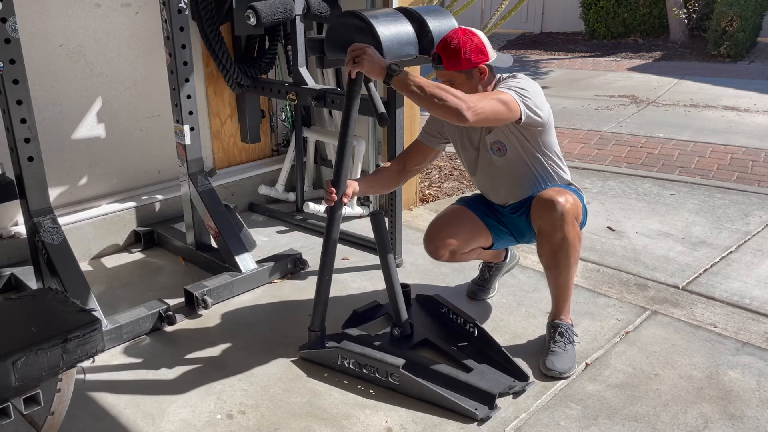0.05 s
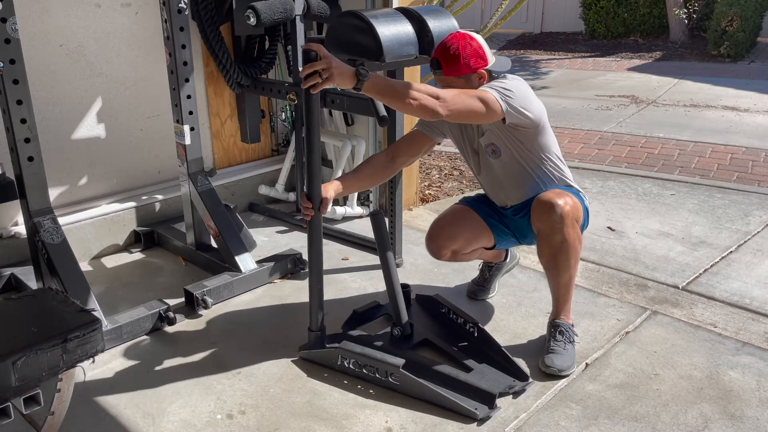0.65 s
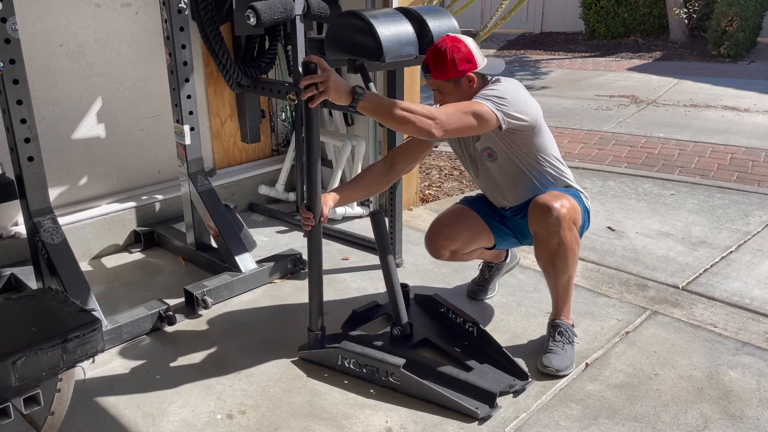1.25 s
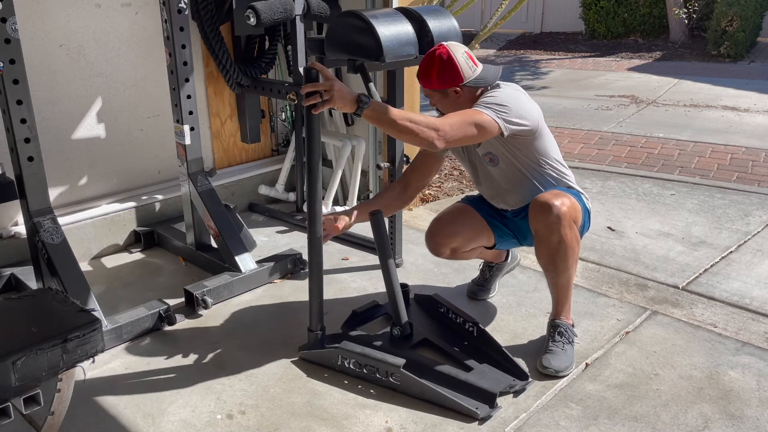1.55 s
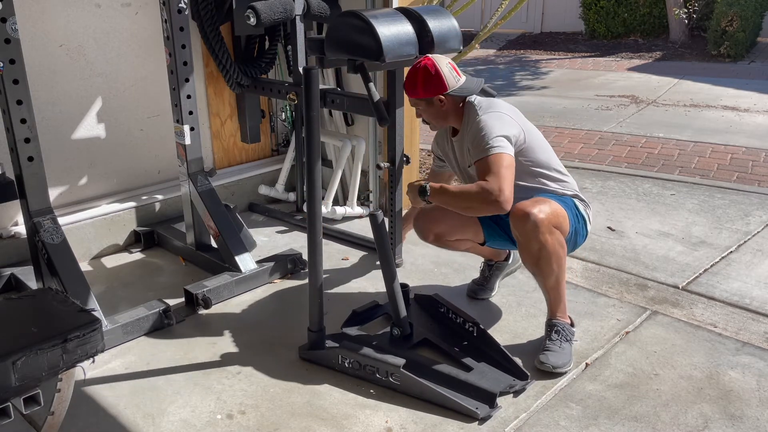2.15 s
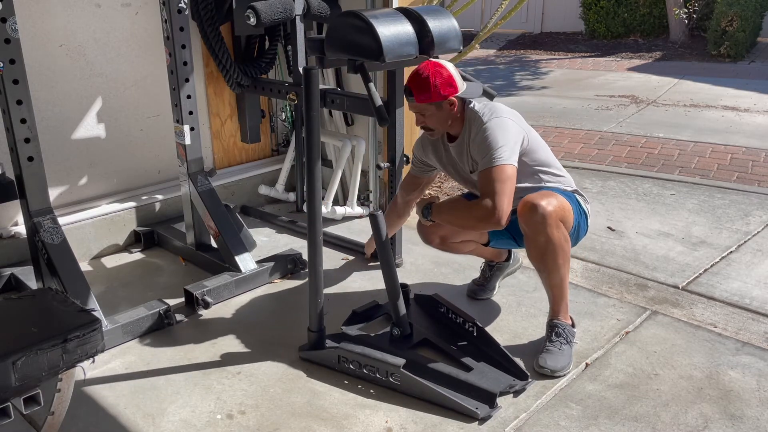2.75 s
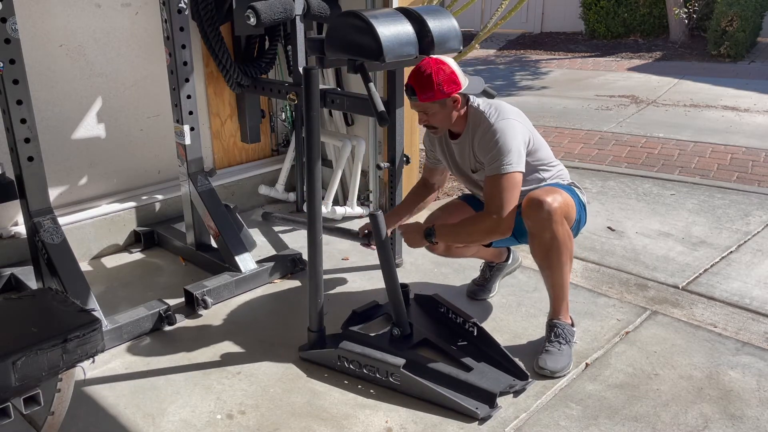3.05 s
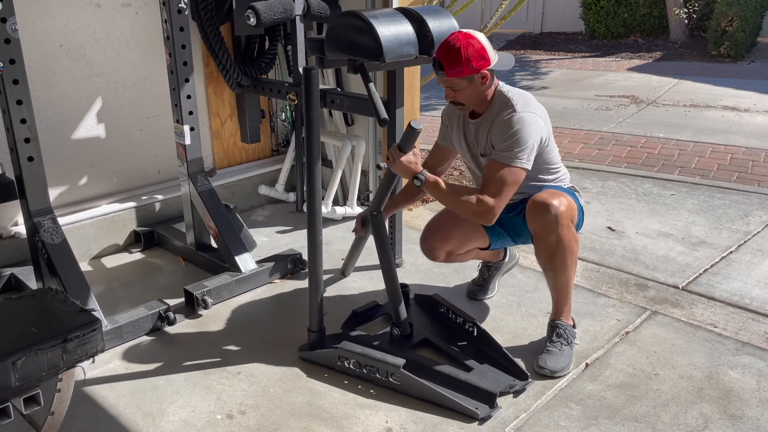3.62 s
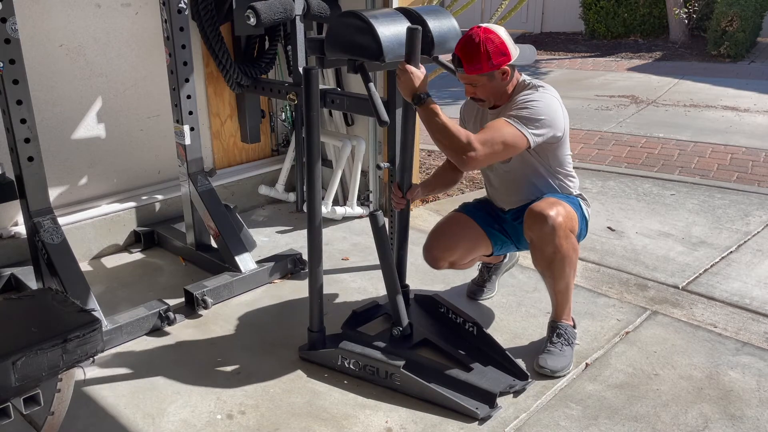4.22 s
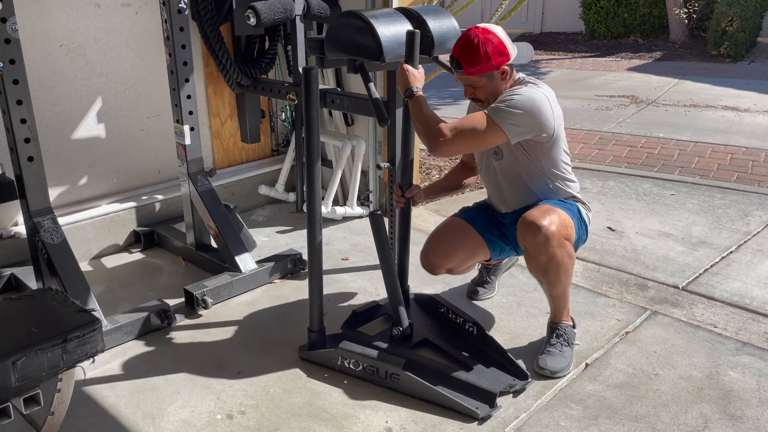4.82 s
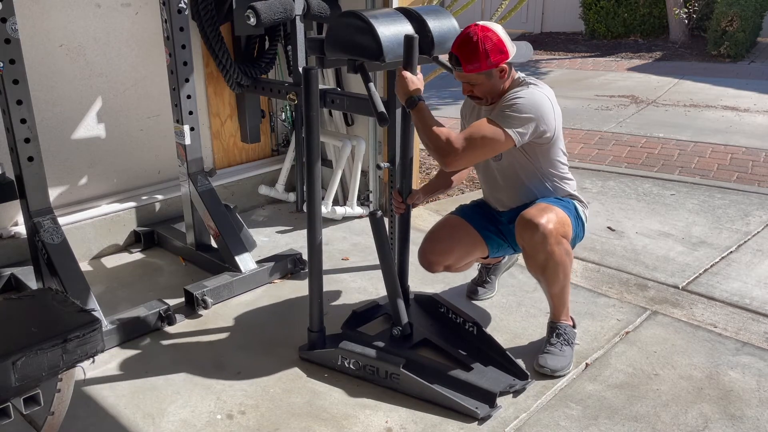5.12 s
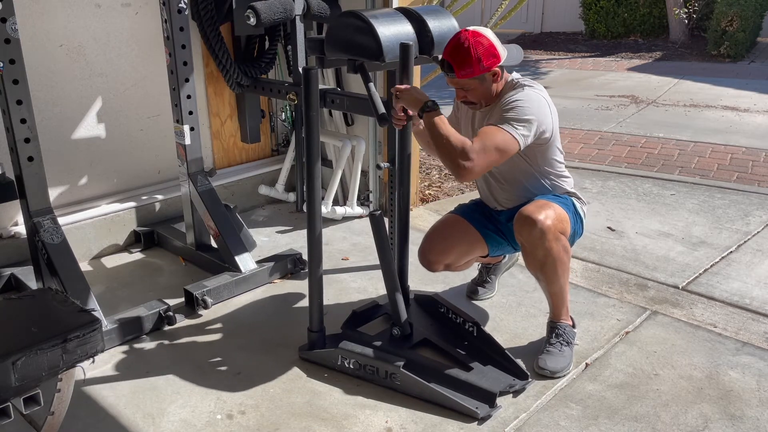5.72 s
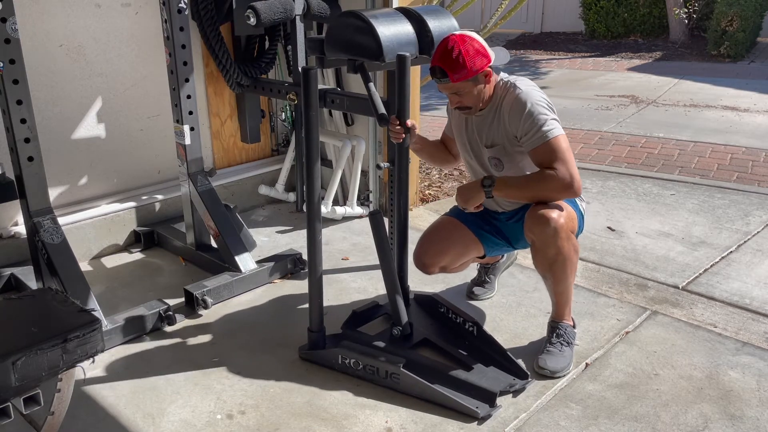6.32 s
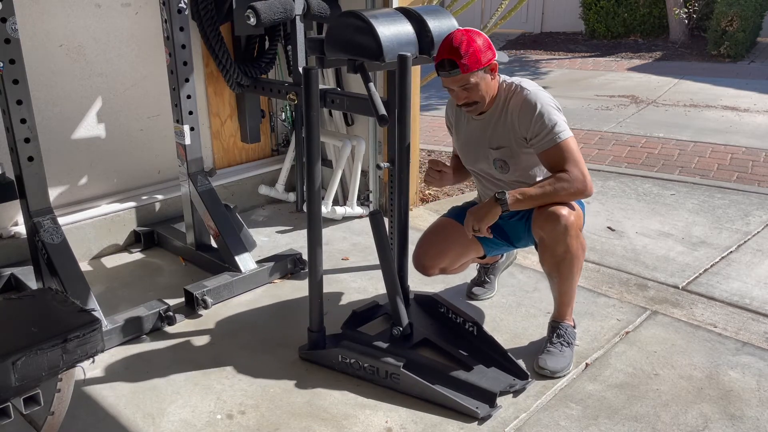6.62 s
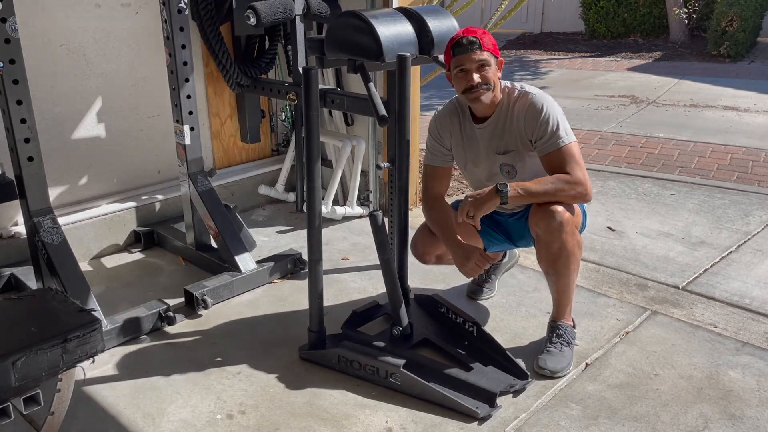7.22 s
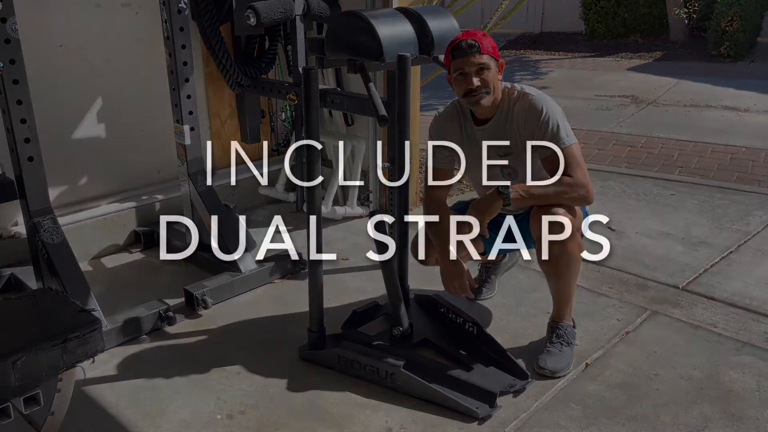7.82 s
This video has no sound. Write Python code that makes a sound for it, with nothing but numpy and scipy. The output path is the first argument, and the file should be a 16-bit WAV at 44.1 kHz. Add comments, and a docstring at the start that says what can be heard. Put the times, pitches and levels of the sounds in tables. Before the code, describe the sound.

A steel sled's post grinds upright and clanks home, then a tube scrapes out, ringing, and drops into its socket with a loud clank.

```python
"""A folding steel push sled is set up at the open door of a garage gym.
Its hinged post grinds upright and clanks home, ringing the frame; a loose steel tube is drawn out
scraping and ringing, knocked into its socket and dropped to the stop. Steel squeals, hands and clothes
brush it, and a low drone and a far bird come in late over still outdoor air.
The hardest clanks overload the microphone, whose gain control ducks and then lifts the ringing tail."""
import sys
import numpy as np
from scipy import signal
from scipy.fft import rfft, irfft, next_fast_len
from scipy.io import wavfile
from scipy.ndimage import uniform_filter1d, minimum_filter1d

SR = 44100
rng = np.random.default_rng(int(sys.argv[2]) if len(sys.argv) > 2 else 0)


def file_out(sig):
    """Save sig as 16-bit WAV at sys.argv[1]."""
    # one column per channel
    cols = np.atleast_2d(sig).T
    # limit, then scale
    lim = np.clip(cols, -1, 1)
    pcm = np.round(lim * 32767).astype(np.int16)
    wavfile.write(sys.argv[1], SR, pcm)


N = 355429
TIME = np.arange(N) / SR
RING_TIME, BURST_TIME = TIME[:N // 8], TIME[:N // 40]

# stereo width, side relative to mid: pitch_hz, width_db
STEREO_WIDTH = [(50, -16), (170, -14), (380, -6), (600, -4), (1000, -1.5), (2100, -7), (4400, -6),
                (6200, -2), (7600, 23), (10000, -14.5), (12000, -2), (14500, 7.5)]
# spectrum of still outdoor air: pitch_hz, level_db
AIR_EQ = [(20, -24), (40, -15.5), (70, -0.5), (150, -6.5), (250, -15), (520, -16.5), (950, -22),
          (1500, -29), (2200, -40), (2900, -40.5), (3600, -44.5), (7000, -49), (11000, -48.5), (15000, -65)]
# where the frame is struck, in the order of the level columns below: place
STRIKE_PLACES = ["hinge", "latch", "socket", "stop"]
# clear ring of the frame: pitch_hz, t60_s, hinge_db, latch_db, socket_db, stop_db
FRAME_PARTIALS = [(475.3, 0.71, -6, -26.5, -30, -15.5), (508.4, 1, -19.5, -27, -13, -21),
                  (649, 0.73, -3.5, -11, 0.5, -21), (661.4, 0.73, -5.5, -7, -2, -11),
                  (733, 0.79, -0.5, -6.5, -16.5, -3.5), (771, 0.79, -2, -3, -4, -11.5),
                  (894, 0.51, -16.5, -22.0, -11.5, -21.5), (980, 0.68, -9.0, -22, -20.5, -23.0),
                  (1008, 0.92, -11.5, -22.5, -20.5, -14), (1085, 0.94, -20.5, -8, -9.5, -17),
                  (1222, 0.4, -14.5, -19.5, -20, -22.0), (1336, 0.77, -8, -4.5, -4, -4.5),
                  (1340, 0.84, -13.0, -4.5, -3.5, -4), (1433, 1, -11.0, -19.5, -21.0, -13),
                  (1488, 0.7, -16.5, -11.5, -15.0, -7.5), (1700, 0.29, -15.5, -20.0, -23, -19),
                  (1647, 0.62, -23.5, -6, -10.5, -13.5), (1863, 0.61, -13, -22.5, -13.0, -8),
                  (1968, 0.6, -20.5, -8.5, -14, -11.5), (2000, 0.6, -13.0, -15.5, -13.5, -15.5),
                  (2185, 0.59, -10.5, -13, -11, -10.5), (2265, 0.36, -10.5, -16, -18.5, -12.0),
                  (2369, 0.52, -26.5, -18.5, -28.5, -6.0), (2412, 0.44, -25.5, -10, -20.5, -26.5),
                  (2600, 0.58, -24.0, -8, -27.0, -5.5), (2650, 0.64, -12.5, -29.0, -18, -9),
                  (2740, 0.57, -17.0, -23, -29.5, -10.5), (2885, 0.57, -26.5, -13.5, -15.5, -18),
                  (2910, 0.69, -25.5, -23.5, -16, -16.5), (3080, 0.67, -27.5, -15, -26.0, -23.5),
                  (3244, 0.56, -11.0, -11, -39.5, -13), (3236, 0.55, -14.5, -10.0, -32.0, -18.5),
                  (3340, 0.55, -31.5, -19.5, -23.5, -14.5), (3430, 0.55, -21.5, -14.5, -26.0, -11.5),
                  (3660, 0.54, -19.5, -11.5, -28.0, -28), (3704, 0.54, -17.0, -13, -26, -8),
                  (3810, 0.59, -28, -12.0, -39.5, -14.5), (3850, 0.54, -21.0, -13.5, -20, -20.5),
                  (4120, 0.49, -22, -16, -34.5, -11), (4371, 0.53, -19, -34, -23, -33.0),
                  (4610, 0.52, -16.0, -11.5, -25.5, -14.5), (4753, 0.67, -27.5, -16, -40.5, -31),
                  (4860, 0.57, -21.0, -23.5, -27, -12), (5109, 0.55, -19, -20, -39, -24.5),
                  (5250, 0.7, -15.0, -21, -37.5, -35.0), (5410, 0.51, -29, -31.5, -27.5, -18.5)]
# spectrum of the crowd of weaker plate modes: pitch_hz, hinge_db, latch_db, socket_db, stop_db
PLATE_EQ = [(92.7, -27, -27.5, -38, -29.5), (203, -6.5, -10.5, 1.5, -15.5), (380, -4.5, -14, -7, -15.5),
            (546, -3, -6, 1, -8.5), (695, 6.5, 0.5, 9.5, -3), (930, 0, -3.5, 6, -7), (1360, -2, -1, 4, -4),
            (2040, -1, 1.5, 2.5, 2), (2820, -6.5, -4.5, -6, -9.5), (3600, -16, -11.5, -17, -13),
            (5100, -13.5, -14, -13, -14), (6200, -20, -20.5, -20, -19), (9900, -23.5, -24, -34, -26),
            (14640, -37, -39, -45.5, -34)]
# how long frame and garage ring together: pitch_hz, t60_s
RING_DECAY = [(100, 0.98), (350, 0.58), (700, 0.65), (2000, 0.58), (4000, 0.48), (7000, 0.4), (13000, 0.49)]
# shoves that grind steel on steel: place, start_s, rise_s, hold_s, grind_db, hiss_db, rumble_db
GRIND_SHOVES = [("hinge", 0.0, .005, 0.051, -39.5, -71.5, -87.5),
                ("hinge", 0.17, 0.072, 0.076, -48.5, -70.5, -60.5),
                ("hinge", 0.49, 0.03, 0.1, -56.5, -61, -72),
                ("hinge", 0.575, 0.017, 0.11, -29, -56.5, -36.5),
                ("hinge", 0.76, 0.013, 0.017, -43, -52.5, -46.5),
                ("hinge", 0.885, 0.012, 0.01, -51, -59.5, -53),
                ("latch", 1.006, 0.0053, 0.062, -30, -47.5, -71),
                ("hinge", 1.052, 0.011, 0.11, -19.5, -44, -31),
                ("socket", 4.895, 0.044, 0.017, -44.5, -58.5, -53.5),
                ("socket", 5.072, 0.014, 0.015, -48.5, -63, -50.5),
                ("socket", 4.5, 0.016, 0.055, -45, -57, -47.5),
                ("socket", 5.305, 0.027, 0.018, -34, -50.5, -37),
                ("socket", 5.36, .015, 0.052, -42.5, -58.5, -42),
                ("socket", 5.48, 0.023, 0.062, -57.5, -66, -49.5),
                ("socket", 5.724, 0.016, 0.008, -51.5, -67, -55.5),
                ("socket", 5.908, 0.005, 0.044, -34, -48, -66.5)]
# the part of the frame's ring that grinding reaches: place, low_hz, high_hz
GRIND_RANGES = [("hinge", 150, 1600), ("latch", 1300, 1700), ("socket", 800, 2400)]
# spectrum of the base on the concrete: pitch_hz, level_db
BASE_EQ = [(40, -25.5), (100, -3.5), (150, 1.5), (195, 4), (260, -6), (400, -10.5), (700, -50.5)]
# blows on the frame: start_s, place, strength_db, brightness_hz
FRAME_HITS = [(0.001, "hinge", -28, 2000), (0.575, "hinge", -29, 2800), (0.604, "hinge", -18.5, 1700),
              (0.647, "hinge", -18.5, 1900), (0.7025, "hinge", -22, 2880), (0.758, "hinge", -29.5, 3200),
              (1.072, "hinge", -13.5, 2780), (1.1013, "hinge", -1, 3600), (1.114, "hinge", -5, 2220),
              (1.144, "hinge", -10, 1200), (1.226, "latch", 2, 5620), (2.447, "stop", -57, 4500),
              (4.263, "socket", -8, 2570), (4.2695, "socket", -5, 2700), (4.561, "socket", -18, 1590),
              (4.597, "socket", -11, 2600), (5.202, "socket", -35.5, 2000), (5.396, "socket", -23, 1700),
              (5.956, "stop", 6, 6000)]
# spectrum of the whole sled rocking: pitch_hz, level_db
ROCKING_EQ = [(25, -5), (60, -4), (130, 12), (250, -7), (600, -44.5)]
# steel squeals, groans and the frame's lingering high ring: peak_s, level_db, pitch_hz, half_length_s
STEEL_TONES = [(1.139, -23, 725, .03), (1.68, -58, 3825, 0.12), (3.02, -16, 1700, 0.0082),
               (3.06, -24.5, 2658, 0.01366), (3.085, -23.5, 1658, 0.026), (3.303, -20, 910, 0.021),
               (3.36, -12.5, 909, 0.015), (3.548, -13.5, 894, .005), (5.245, -34, 432, 0.009),
               (5.258, -30, 140, .012), (5.277, -27, 186, .013), (5.34, -37.5, 174.3, .025),
               (5.397, -33.5, 188, .014)]
# hands and clothes brushing: peak_s, level_db, half_length_s
BRUSH_CUES = [(2.061, -71.5, 0.032), (2.699, -67.5, .032), (3.291, -54, 0.063), (3.557, -56.5, .046),
              (3.977, -75.5, .22), (4.377, -65, 0.091), (4.948, -56, 0.025), (5.163, -61, 0.078),
              (5.244, -52.5, 0.0037), (6.324, -58, 0.087), (6.666, -68, 0.029)]
# spectrum of skin and cloth on steel: pitch_hz, level_db
BRUSH_EQ = [(1500, -13), (3500, -1), (5200, -2.5), (7500, -3), (10000, -5.5), (12500, -6), (14000, -15)]
# light grazes as the hand takes the tube: start_s, rise_s, hold_s, bending_db, wall_db, rub_db
TUBE_GRAZES = [(2.13, 0.026, 0.019, -61.5, -63, -64.5), (2.55, 0.022, 0.044, -79, -62.5, -75),
               (2.745, 0.015, 0.032, -71, -66.5, -61)]
# how hard the tube scrapes as it is drawn out: time_s, level_db
SCRAPE_CURVE = [(2.7, -88), (2.78, -54), (2.86, -48), (2.912, -39), (2.995, -42), (3.04, -35),
                (3.14, -36.5), (3.304, -30), (3.42, -36), (3.56, -36), (3.69, -58), (3.9, -86)]
# low ring of the tube flexing: pitch_hz, width_hz, level_db
BENDING_MODES = [(909.3, 16, 1.5), (880, 39, -1.5), (1698.5, 39, -0.5), (1714, 47, -15), (2580, 18, -32)]
# bright ring of the tube's wall: pitch_hz, width_hz, level_db
WALL_MODES = [(2683, 27, 6), (3760, 14, -3), (4550, 30, -5.5), (4414, 20, 3), (4490, 16, -0.5),
              (4670, 28, -2), (4670, 28, -2.5), (4960, 28, -7), (5000, 19, -0.5), (5330, 40, -3.5),
              (5710, 19.8, -2), (6240, 27, -8.5), (6777, 28, -8), (7470, 31, -11.5), (8140, 25, -21),
              (8796, 24, -14), (9572, 24, -20.5), (10270, 40, -19.5), (11122, 50, -27), (11461, 30, -24.5),
              (12129, 31, -15), (12540, 130, -13.5)]
# spectrum of the tube rubbing its holder: pitch_hz, level_db
RUB_EQ = [(60, -29.5), (145, -27), (185, 0), (310, 5.5), (430, 3.5), (680, 7.5), (1100, 5.5), (1450, -2),
          (2200, -9), (3400, -21), (5000, -39), (7000, -50), (12000, -42.5), (15000, -37)]
# the tube bumps its holder: start_s, knock_db, thud_db
TUBE_BUMPS = [(3.013, -18, -39), (3.21, -33.5, -45.5), (3.322, -33, -32), (3.362, -22.5, -36.5),
              (3.531, -33.5, -34.5)]
# swells of a low drone that sets in as the tube sinks: start_s, rise_s, hold_s, level_db
DRONE_SWELLS = [(5.27, .02, 0.054, -38.5), (5.47, .04, 0.07, -52), (5.82, 0.055, .1, -52),
                (6.27, .05, 0.09, -46), (7.15, .08, .13, -59)]
# a far bird's call: start_s, rise_s, hold_s, level_db
BIRD_CUES = [(7.52, .03, .41, -81)]
# spectrum of that call: pitch_hz, level_db
BIRD_EQ = [(1500, -70), (2350, -18), (2650, -4), (2950, 0), (3250, -18), (4500, -70)]


def from_db(db):
    """Decibels to gain."""
    return np.exp(np.asarray(db) * (np.log(10) / 20))


def unit_power(x):
    """Scale to an RMS of one."""
    return x / np.sqrt(np.mean(x ** 2) + 1e-20)


def unit_energy(x):
    """Scale a response so that it passes white noise at equal power."""
    return unit_power(x) / np.sqrt(x.shape[-1])


def at_hz(points, hz):
    """Read a table on a log-frequency axis."""
    points_hz, values = np.transpose(points)
    return np.interp(np.log(np.maximum(hz, 1)), np.log(points_hz), values)


def butter(x, hz, kind, order=2):
    """Butterworth low-pass or high-pass."""
    return signal.sosfilt(signal.butter(order, hz, kind, fs=SR, output="sos"), x)


def through(force, response):
    """Play a force through a stereo response."""
    return signal.oaconvolve(np.atleast_2d(force), response, axes=-1)[:, :N]


def add(out, start_s, sound):
    """Mix a sound in at its cue."""
    start = max(round(start_s * SR), 0)
    out[:, start:start + sound.shape[-1]] += sound[:, :N - start]


def spread(mid, side, hz):
    """Left and right from mid and side, with the width set by pitch."""
    width = from_db(at_hz(STEREO_WIDTH, hz))
    return np.array([mid + width * side, mid - width * side]) / np.sqrt(1 + width ** 2)


def noise(eq, size=N):
    """Stereo noise of a given spectrum, at unit power."""
    length = next_fast_len(size)
    mid, side = rfft(rng.standard_normal((2, length)))
    hz = np.arange(len(mid)) * SR / length
    spectrum = spread(mid, side, hz) * from_db(at_hz(eq, hz))
    return unit_power(irfft(spectrum, length)[:, :size])


def burst(eq, rise_s, decay_s):
    """A short contact noise that swells and dies."""
    envelope = (1 - np.exp(-BURST_TIME / rise_s)) * np.exp(-BURST_TIME / decay_s)
    return envelope * noise(eq, len(BURST_TIME))


def swells(cues, release_s):
    """One envelope per level column: rise to the cue, hold, release; overlaps add in power."""
    power = 0
    for start_s, rise_s, hold_s, *levels_db in cues:
        early = np.maximum(start_s - TIME, 0) / rise_s
        late = np.maximum(TIME - start_s - hold_s, 0) / release_s
        envelope = np.exp(-np.minimum(early + late, 30))
        power = power + np.outer(from_db(levels_db), envelope) ** 2
    return np.sqrt(power)


def bell_curve(from_peak_s, half_s):
    """A smooth fade in and out around a peak."""
    return np.exp(-np.minimum((from_peak_s / half_s) ** 2, 50))


def flutter(per_s, depth_db):
    """A randomly wavering gain, like the uneven pressure of a sliding contact."""
    knots_s = np.arange(0, TIME[-1] + 1, 1 / per_s)
    wobble = rng.standard_normal(2000)[:len(knots_s)]
    return from_db(depth_db * np.interp(TIME, knots_s, wobble))


def outdoor_air():
    """A steady bed of quiet, mostly low noise."""
    return from_db(-60.5) * noise(AIR_EQ)


def mode(hz, t60_s):
    """One decaying sine, reaching the two sides out of phase."""
    phase = 2 * np.pi * (hz * RING_TIME + rng.random())
    tone = spread(np.sin(phase), np.cos(phase) * rng.choice([-1, 1]), hz)
    return tone * from_db(-60 * RING_TIME / t60_s)


def frame_modes(split_hz, twin_db, joint_loss_db_per_s):
    """The clear ring by place: the sled's halves are slightly out of tune, and loose joints damp them."""
    pairs = []
    for hz, t60_s, *_ in FRAME_PARTIALS:
        twin_hz = hz + split_hz * rng.uniform(0.32, 1.8) * rng.choice([-1, 1])
        pairs.append(mode(hz, t60_s) + from_db(twin_db) * mode(twin_hz, t60_s))
    rings = np.array(pairs) * from_db(-joint_loss_db_per_s * RING_TIME)
    strengths = from_db(np.array(FRAME_PARTIALS)[:, 2:].T)
    return dict(zip(STRIKE_PLACES, np.tensordot(strengths, rings, axes=1)))


def dense_ring(eq, damping):
    """A wash of countless overlapping modes: each octave dies at its own pace."""
    size = len(RING_TIME)
    spectrum = rfft(noise(eq, size), 2 * next_fast_len(size // 2 + 1))
    hz = np.linspace(1, SR / 2, spectrum.shape[-1])
    octaves_hz = np.geomspace(100, 12800, 8)
    out = 0
    for centre_hz, solo in zip(octaves_hz, np.eye(len(octaves_hz))):
        crossover = np.interp(np.log(hz), np.log(octaves_hz), solo)
        band = irfft(spectrum * crossover)[:, :size]
        out = out + band * from_db(-60 * RING_TIME * damping / at_hz(RING_DECAY, centre_hz))
    return out


def frame_response(clear_rings, place, damping, modes_db, crack_db, crack_s, grip_db_per_s):
    """The sled struck at one place: a crack, clear modes and a dense ring, choked by gripping hands."""
    eq = np.array(PLATE_EQ)[:, [0, 1 + STRIKE_PLACES.index(place)]]
    attack = 1 - np.exp(-RING_TIME / 0.0018)
    out = dense_ring(eq, damping) + from_db(modes_db) * clear_rings[place] * attack
    add(out, 0, from_db(crack_db) * burst(eq, rise_s=0.00054, decay_s=crack_s))
    return out * from_db(-grip_db_per_s * RING_TIME)


def slips(per_s, uneven_db):
    """Friction: tiny random slips of uneven size, evened out in the long run."""
    sizes = from_db(uneven_db * np.minimum(rng.exponential(1, N), 4)) * rng.choice([-1, 1], N)
    force = sizes * (rng.random(N) < per_s / SR)
    local_power = np.maximum(uniform_filter1d(force ** 2, size=2000), 0)
    return force / np.sqrt(local_power + 1e-4)


def grinding(clear_rings):
    """Coarse slips rattle the gripped frame, fine ones hiss, heavy ones shake the base."""
    shaking = flutter(per_s=60, depth_db=2) * noise(BASE_EQ)
    out = 0
    for place, low_hz, high_hz in GRIND_RANGES:
        shoves = [row[1:] for row in GRIND_SHOVES if row[0] == place]
        grind, hiss, rumble = swells(shoves, release_s=0.045)
        held = frame_response(clear_rings, place, damping=0.91, modes_db=-2.5,
                              crack_db=11, crack_s=0.022, grip_db_per_s=110.5)
        coarse_ring = butter(butter(held, low_hz, "high", order=1), high_hz, "low")
        fine_ring = butter(butter(held, 4300, "high", order=3), 13000, "low", order=1)
        coarse_force = grind * flutter(per_s=70, depth_db=3) * slips(per_s=600, uneven_db=4)
        coarse = through(coarse_force, unit_energy(coarse_ring))
        fine = through(hiss * slips(per_s=1500, uneven_db=3), unit_energy(fine_ring))
        out = out + from_db(-0.5) * coarse + from_db(1) * fine + from_db(1.5) * rumble * shaking
    return out


def clanks(clear_rings, bounce_s=0.0055, bounce_db=-7):
    """Each blow rings the frame with its own strength and brightness, rebounds and thuds the base."""
    voicings = {
        "hinge": dict(damping=1.0, modes_db=-3, crack_db=12, crack_s=0.011, grip_db_per_s=21.5),
        "latch": dict(damping=0.82, modes_db=-6, crack_db=14.5, crack_s=0.011, grip_db_per_s=2.5),
        "socket": dict(damping=0.66, modes_db=-3, crack_db=8.5, crack_s=0.02, grip_db_per_s=50),
        "stop": dict(damping=0.91, modes_db=-6, crack_db=10.5, crack_s=0.014, grip_db_per_s=5)}
    struck = {place: frame_response(clear_rings, place, **voicings[place]) for place in STRIKE_PLACES}
    out = np.zeros((2, N))
    for start_s, place, strength_db, brightness_hz in FRAME_HITS:
        attack = 1 - np.exp(-RING_TIME * brightness_hz / 2.2)   # a dull contact takes longer to build
        clank = from_db(strength_db - 16) * butter(struck[place] * attack, brightness_hz, "low")
        add(out, start_s, clank)
        add(out, start_s + bounce_s * rng.uniform(0.8, 1.2), from_db(bounce_db) * clank)
        add(out, start_s, from_db(strength_db - 28) * burst(BASE_EQ, rise_s=0.002, decay_s=0.02))
        rocking_db = 2 * strength_db - 27.5   # only the hardest blows rock the whole sled
        add(out, start_s, from_db(rocking_db) * burst(ROCKING_EQ, rise_s=0.003, decay_s=0.0082))
    return out


def steel_tones():
    """Brief squeals and groans of steel, and the frame's high ring lingering after the clank."""
    out = np.zeros((2, N))
    for peak_s, level_db, hz, half_s in STEEL_TONES:
        lead_s = 3 * half_s
        envelope = from_db(level_db) * bell_curve(RING_TIME - lead_s, half_s)
        add(out, peak_s - lead_s, envelope * mode(hz, t60_s=np.inf))
    return out


def garage(x, wet_db):
    """The open garage answers with a faint tail."""
    tail = dense_ring(eq=[(100, 2.5), (3000, -6.5), (14000, -12)], damping=1)
    return x + from_db(wet_db) * through(x, unit_energy(tail))


def brushes():
    """Soft swells of skin and cloth on steel."""
    envelope = sum(from_db(db) * bell_curve(TIME - peak_s, half_s) for peak_s, db, half_s in BRUSH_CUES)
    return envelope * noise(BRUSH_EQ)


def tube_response(modes):
    """Tube modes build quickly; the wider a resonance, the sooner it dies."""
    rings = sum(from_db(db) * unit_energy(mode(hz, t60_s=np.log(1000) / (np.pi * width_hz)))
                for hz, width_hz, db in modes)
    attack = (1 - np.exp(-RING_TIME / 0.00072)) ** 2
    return unit_energy(rings * attack)


def tube_ring(force, modes, flares_per_s, depth_db, groups):
    """The contact wanders over the tube, so that groups of modes flare and fade in turn."""
    powers = from_db(np.array(modes)[:, 2]) ** 2
    out = 0
    for k in range(groups):
        share = powers[k::groups].sum() / powers.sum()
        ring = through(force * flutter(flares_per_s, depth_db), tube_response(modes[k::groups]))
        out = out + np.sqrt(share) * ring
    return out


def tube():
    """The tube rubs along its holder in fits, ringing in bending and wall modes, and bumps it."""
    times_s, levels_db = np.transpose(SCRAPE_CURVE)
    scrape = from_db(np.interp(TIME, times_s, levels_db)) * (TIME >= times_s[0]) * (TIME <= times_s[-1])
    effort = scrape / scrape.max()
    graze_bending, graze_wall, graze_rub = swells(TUBE_GRAZES, release_s=0.061)
    bending = from_db(6) * scrape.max() * effort ** 1.014 + graze_bending
    wall = from_db(0.8) * scrape + graze_wall
    rubbing = from_db(0.5) * scrape + graze_rub
    bending_force = bending * slips(per_s=2500, uneven_db=8.5)
    out = tube_ring(bending_force, BENDING_MODES, flares_per_s=30, depth_db=1, groups=2)
    wall_force = wall * slips(per_s=900, uneven_db=3.5)
    out += tube_ring(wall_force, WALL_MODES, flares_per_s=45, depth_db=4.5, groups=3)
    out += rubbing * flutter(per_s=73, depth_db=1.5) * noise(RUB_EQ)
    for start_s, knock_db, thud_db in TUBE_BUMPS:
        add(out, start_s, from_db(knock_db) * burst(RUB_EQ, rise_s=0.0022, decay_s=0.015))
        add(out, start_s, from_db(thud_db) * burst(BASE_EQ, rise_s=0.017, decay_s=0.022))
    return out


def drone(pitch_hz=57, step_hz=3.8, step_at_s=6.45, glide_s=0.15):
    """A deep tone that swells, ebbs and takes one smooth step up in pitch."""
    envelope, = swells(DRONE_SWELLS, release_s=0.15)
    hz = pitch_hz + step_hz * (1 + np.tanh((TIME - step_at_s) / glide_s)) / 2
    return envelope * np.sin(2 * np.pi * np.cumsum(hz) / SR)


def bird():
    """A faint, raspy twitter from across the street."""
    envelope, = swells(BIRD_CUES, release_s=0.03)
    return envelope * flutter(per_s=30, depth_db=3) * noise(BIRD_EQ)


def scene():
    """Sled, tube and handling, with the drone and the bird, over the quiet air of the driveway."""
    clear_rings = frame_modes(split_hz=11, twin_db=-3, joint_loss_db_per_s=14.5)
    sled = clanks(clear_rings) + grinding(clear_rings)
    lean_left = from_db([[0.9], [-0.9]])
    post = garage(tube() + steel_tones(), wet_db=-15) * lean_left
    return sled + post + brushes() + drone() + bird() + outdoor_air()


def gain_control(x, limit_db, hold_s, release_db_per_s, attack_s):
    """Loud sound ducks the gain, which holds, then creeps back; a clank's first edge slips through."""
    power = uniform_filter1d(np.mean(x ** 2, axis=0), size=200)
    over_db = np.maximum(10 * np.log10(np.maximum(power, 1e-12)) - limit_db, 0)
    window = 2 * int(hold_s * SR / 2) + 1
    held_db = -minimum_filter1d(-over_db, window, origin=window // 2)
    release_db = release_db_per_s * TIME
    duck_db = np.maximum.accumulate(held_db + release_db) - release_db
    pole = np.exp(-1 / (attack_s * SR))
    return x * from_db(-signal.lfilter([1 - pole], [1, -pole], duck_db))


def record(dry):
    """Gain control, soft-clipped peaks, a closing fade and a steep top cut."""
    ceiling, fade_s, cutoff_hz = 0.88, 1.75, 15800
    ducked = gain_control(dry, limit_db=-10.5, hold_s=0.18, release_db_per_s=90, attack_s=0.004)
    rounded = ceiling * np.tanh(ducked / ceiling)
    fade = np.minimum((N / SR - TIME) / fade_s, 1)
    return butter(rounded * fade, cutoff_hz, "low", order=16)


dry = scene()
out = record(dry)
file_out(out)
```